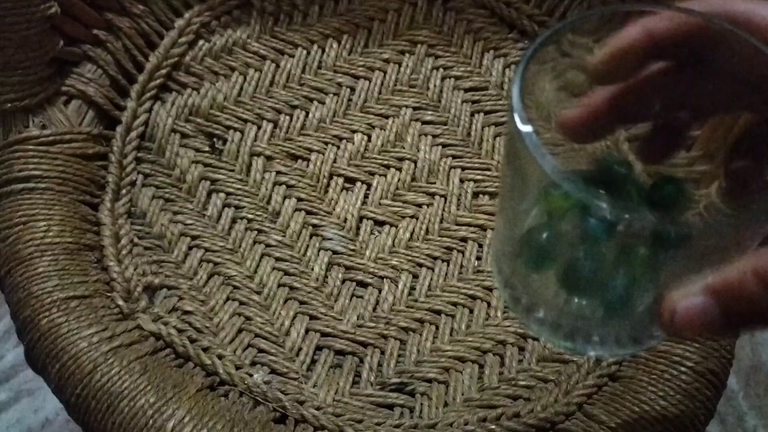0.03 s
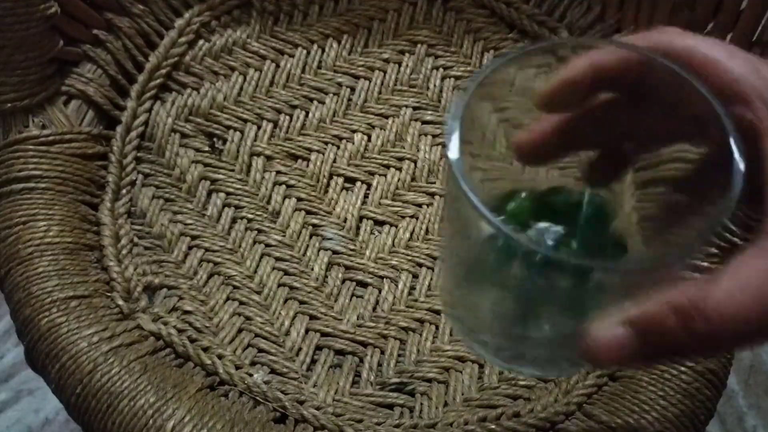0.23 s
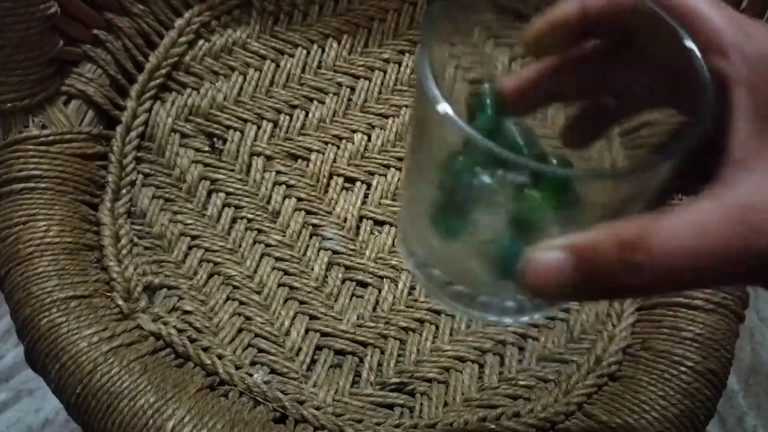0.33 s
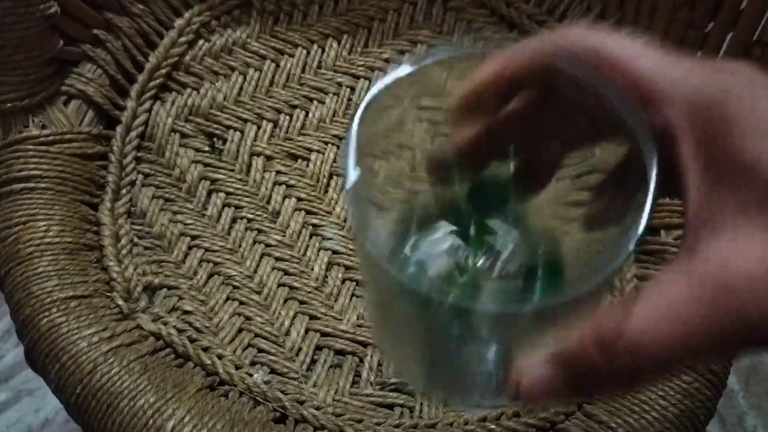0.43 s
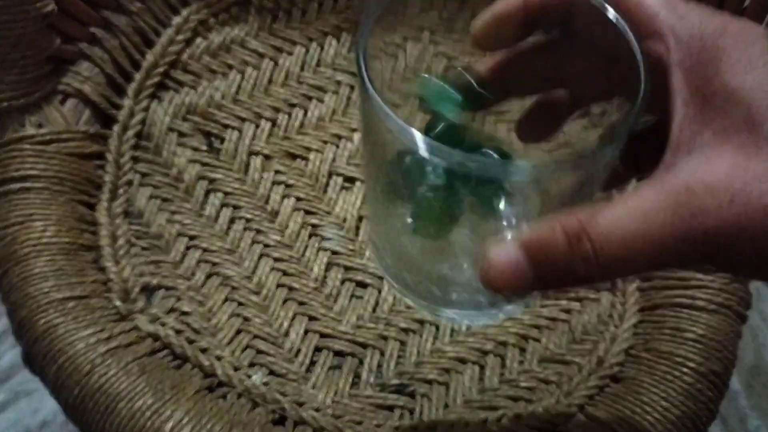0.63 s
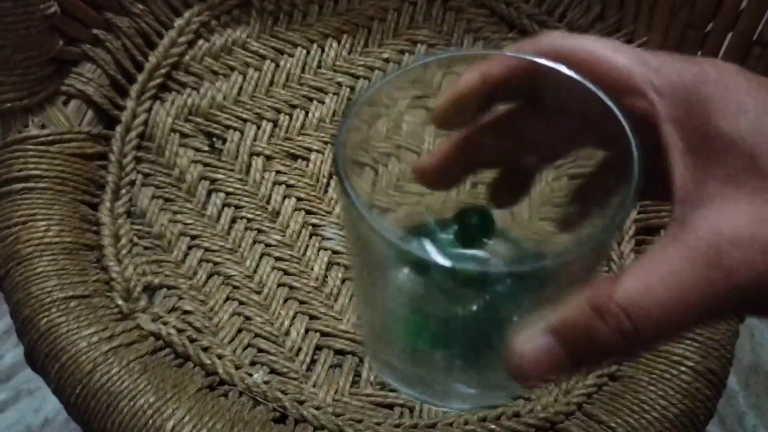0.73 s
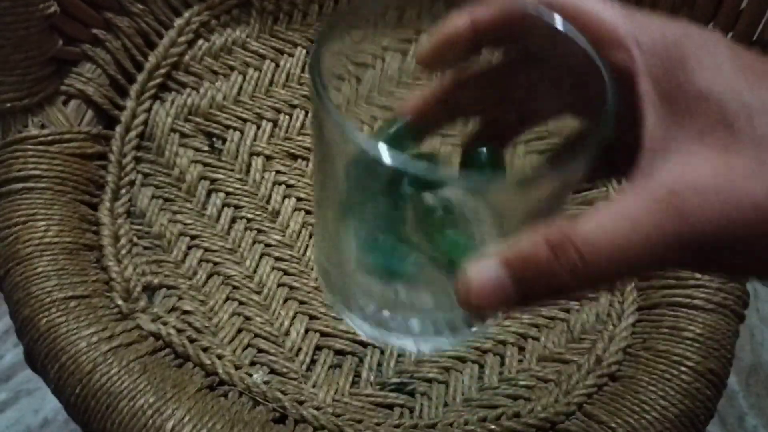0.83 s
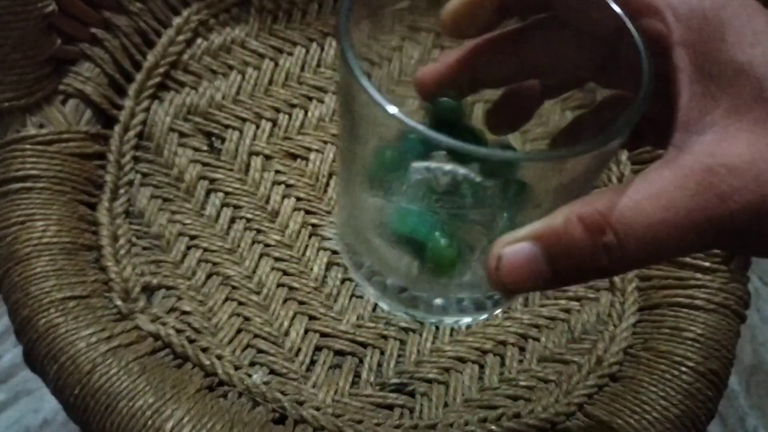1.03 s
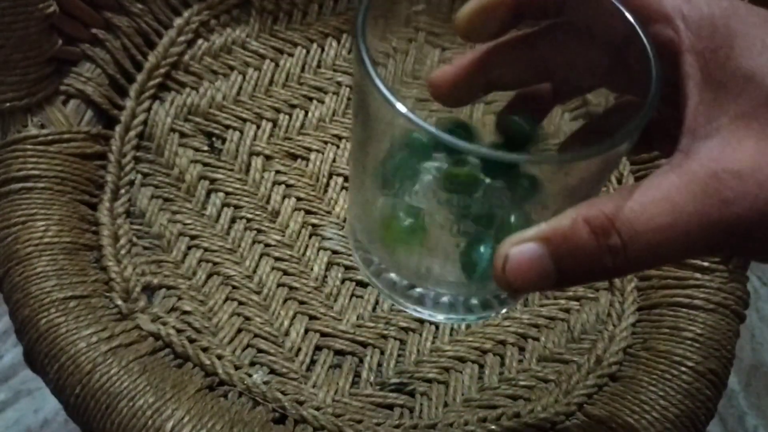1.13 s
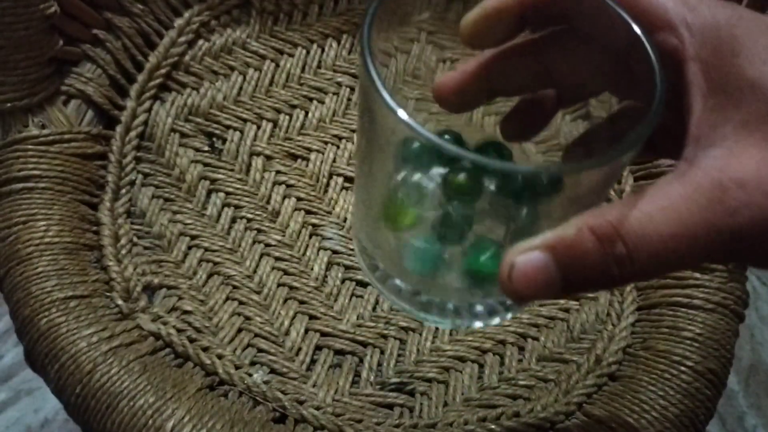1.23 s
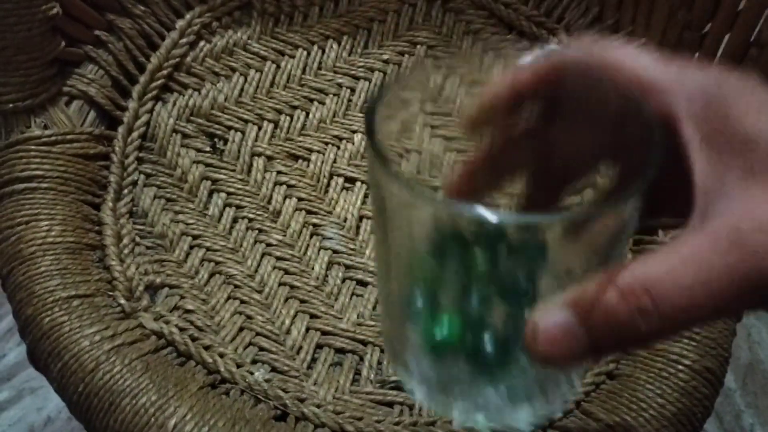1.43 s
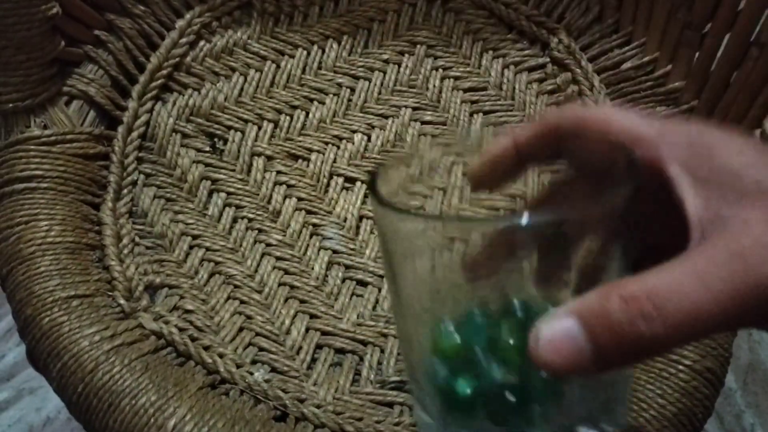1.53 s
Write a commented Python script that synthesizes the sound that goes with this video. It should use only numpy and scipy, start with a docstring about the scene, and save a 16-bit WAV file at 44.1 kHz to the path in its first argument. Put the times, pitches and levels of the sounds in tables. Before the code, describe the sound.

Glass marbles are swirled in a drinking glass close by in a small room. They clack together, rumble over the base and make the glass ring, with a few dull pops, then ease to light ticking over a faint hum.

```python
"""A hand starts to swirl a dozen glass marbles in a drinking glass, close by in a small room.
They clack against each other, rumble over the base and strike the wall, which rings.
Early on, the hardest shakes bring dull pops. After a second the swirl eases to light ticking,
while a low hum like that of a fan, there all along, grows a little and holds steady."""
import sys
import numpy as np
from scipy import signal
from scipy.fft import rfft, irfft
from scipy.io import wavfile
from scipy.ndimage import uniform_filter1d

SR = 44100
rng = np.random.default_rng(int(sys.argv[2]) if len(sys.argv) > 2 else 0)


def store_wav(level_fs):
    """Save 16-bit WAV to argv[1]."""
    pcm = np.round(np.clip(np.atleast_2d(level_fs), -1, 1) * 32767)
    wavfile.write(sys.argv[1], SR, pcm.T.astype(np.int16))


N = 70560
T = np.arange(N) / SR

# Levels in the tables are relative: the settings below turn whole layers up or down.
# how strong the swirl is: (time [s], clatter [dB], ringing wall [dB], rolling [dB])
SWIRL_LEVELS = [(.073, -34.5, -37, -49.5), (.115, -36.5, -47, -35.5), (0.149, -32.5, -26, -37),
                (0.216, -22.5, -56, -30), (0.239, -35, -31, -37), (0.273, -18, -22, -27),
                (0.304, -33.5, -19, -35), (0.357, -25.5, -30.5, -25.5), (0.383, -47.5, -24.5, -46),
                (.44, -33, -37, -41.5), (.495, -35, -29.5, -36), (.545, -30, -35.5, -36),
                (.605, -33.5, -28.5, -39.5), (.692, -34, -35, -41), (.725, -37.5, -29.5, -45),
                (.775, -28, -23.5, -37.5), (.815, -31, -31.5, -36.5), (.905, -28, -25.5, -35),
                (.965, -32.5, -28.5, -34.5), (.997, -23.5, -24, -34.5), (1.042, -30, -25, -37.5),
                (1.069, -38.5, -40, -42), (1.17, -34, -37.5, -40.5), (1.21, -33.5, -32.5, -42.5),
                (1.34, -33.5, -41, -38), (1.39, -38, -41, -40), (1.53, -36, -39.5, -41),
                (1.6, -38.5, -42.5, -38)]
# single hard hits: (time [s], clack [dB], middle ring [dB], low ring [dB], high pings [dB])
HARD_HITS = [(.123, -7.5, -32, -36, -39), (.145, -4, -24, -17.5, -8), (0.149, 1, -24, -13, -17),
             (.177, -7, -9, -9.5, -14), (0.185, -2, -32, -29, -10), (.206, -20, -21, -33, -12),
             (0.215, -11, -16, -11, -14), (0.244, -5, -25, -14, -14), (.251, -4, -30, -25, -13),
             (0.2565, -14, -21, -9, -9), (0.2679, -14, -7, -20, -8), (0.2753, 2, 0, -24, -4),
             (0.2843, -0.5, -3, -5, -12), (0.2902, -3, -10, -8, -4.5), (0.3092, -9, -26, -14.5, -9),
             (0.3159, -5, -11, -8, -25), (.325, -7, -10, -17, -15), (.3305, -1.5, -12, -8, -24),
             (0.346, -1.5, -3, -13.5, -4), (.3535, -11, -23, -7.5, -23), (.3615, -9, -26, -29, -8.5),
             (.393, -12, -10, -29, -25), (.406, -11, -11, -13, -16), (0.453, -10, -23, -14, -22),
             (.470, 0, -11, -10.5, -9), (0.4853, -6, -14, -11, -6), (.5025, -11.5, -18, -23, -17),
             (0.5107, -1, -9.5, -10, -7.5), (0.526, -7, -15, -8.5, -27), (.562, -9, -12.5, -14, -10),
             (.586, -8, -26, -28, -14), (0.605, -17, -11.5, -18, -27), (.6765, -13, -20, -15, -16),
             (0.7005, 0, -7, -23, -14), (.759, -9.5, -9, -21, -28), (0.7709, -18, -26, -7, -12),
             (.788, -3, -7, -10, -10), (.812, -27, -14, -30, -13), (.834, -10, -19, -39, -17),
             (0.853, -28, -19, -16, -11.5), (.880, -7, -22, -36, -11), (0.905, -7, -15, -17, -14),
             (.93, -9, -10.5, -8, -12), (0.988, -5, -19, -16, -28), (0.996, -12, -20, -37, -17),
             (1.021, -10, -8, -11.5, -6.5), (1.034, -17, -11, -36, -27), (1.053, -15, -26, -28, -25),
             (1.080, -22, -21, -12, -16.5), (1.093, -19, -19, -21, -24), (1.1109, -18, -21, -38, -35),
             (1.144, -26, -23, -13, -16), (1.488, -15.5, -34, -34, -34)]
# marbles settling against each other: (time [s], tick [dB], small clink [dB])
SETTLING_TICKS = [(1.1285, -18, -48), (1.178, -22, -46), (1.2, -9, -32), (1.2642, -14, -38),
                  (1.2909, -25, -36), (1.3172, -30, -46), (1.332, -24, -46), (1.4092, -17.5, -54),
                  (1.465, -24, -54)]
# tone colour of a clack: (frequency [Hz], level [dB])
CLACK_COLOUR = [(300, -22.5), (1000, -1.5), (1900, -21), (2500, 0), (3100, 1.5), (3500, -1.5), (4100, 0.5),
                (5300, -0.5), (6000, 2), (6400, 1), (7200, 3), (8300, -9.5), (9000, -17), (9600, -28),
                (11000, -19), (12700, -27), (14300, -9), (15400, -7)]
# tones of the glass, damped by the hand; the lowest come from the air inside:
# (frequency [Hz], level [dB], time to fade by 60 dB [s])
GLASS_TONES = [(952, -14, 0.036), (1031, -18, 0.075), (2303, -9, 0.15), (2333, -11.5, 0.09),
               (3098, -6.5, 0.029), (3998, -8, 0.031), (4810, -7.5, 0.11), (4864, -8.5, 0.088),
               (8183, -1.5, 0.021), (10650, -17, 0.027), (11410, -6, 0.026), (14040, -11.5, 0.023),
               (15000, -20, 0.04), (15200, -11, 0.075)]
# boost or cut of the wall's strongest, singing tones: (time [s], level [dB])
SINGING_LEVEL = [(.1, -3), (.42, -6.5), (.52, 6.5), (.65, 0.5), (1.03, 0.5), (1.15, 1), (1.4, -7.5)]
# treble of the light touches on the wall: (time [s], level [dB])
TOUCH_BRIGHTNESS = [(.1, -1.5), (.3, -4.5), (.55, 1.5), (.72, -4), (.87, -2.5), (1.05, -2.5), (1.5, -4)]
# tone colour of the splash, the short hiss of a blow on the wall: (frequency [Hz], level [dB])
SPLASH_COLOUR = [(1500, -14.5), (3000, -2.5), (5000, -16), (8300, 1), (9400, -22), (10700, 2.5), (11500, 0),
                 (12700, -1), (14300, -7), (15400, 3)]
# dull pops: (time [s], signed peak [gain], upper edge [Hz], lower edge [Hz], crack on top [gain])
DULL_POPS = [(0.2236, 0.5, 1560, 120, 0.035), (0.275, -0.24, 375, 124, 0.14),
             (0.3471, -0.33, 705, 126, 0.11), (.368, -0.5, 1550, 487, 0.71), (.3692, 0.48, 1570, 318, 0.42),
             (0.47, 0.35, 1740, 172, 0.2), (0.5119, 0.42, 2200, 155, 0.16), (0.5243, -0.35, 1370, 200, 1),
             (0.5569, -0.1, 806, 160, .02), (0.5677, -0.72, 1840, 342, 0.53), (0.569, 0.2, 2560, 565, 0.58),
             (0.5705, -0.12, 1720, 201, 0.52), (.572, 0.41, 1350, 145, 0.17),
             (0.5848, 0.29, 1770, 146, 0.068), (0.7008, -0.62, 1070, 557, 0.51),
             (0.7014, 0.12, 780, 114, 0.035)]
# tone colour of rolling; the air in the glass rings near 1 kHz: (frequency [Hz], level [dB])
ROLL_COLOUR = [(40, -25.5), (110, -8), (170, 4.5), (220, 2), (290, 2.5), (400, -2.5), (730, -11), (880, -1),
               (975, 4), (1200, -5), (1700, -13.5), (3000, -33.5)]
# tones of the hum: (frequency [Hz], early level [dB], late level [dB])
HUM_TONES = [(84.9, -50, -38), (170.8, -44, -45.5)]
# tone colour of the room noise: (frequency [Hz], level [dB])
NOISE_COLOUR = [(25, -13), (80, 6), (220, 2), (283, 10.5), (350, -8), (600, -2), (2000, -11.5),
                (15000, -33)]

START_S, HUM_CHANGE_S = 0.07, (0.74, 1.23)
CLACKS_PER_S, TOUCHES_PER_S, BUMPS_PER_S = 1100, 740, 1500
THINNING = 0.36   # gentler swirling gives fewer clacks: dB of rate per dB of level
# a T60 is the time a sound takes to fade by 60 dB
SNAP_T60_S, SCATTER_T60_S, SPLASH_T60_S, ROOM_T60_S = 0.002, 0.024, 0.037, 0.15
TINT_DB, TINT_STEP_HZ = 2.8, 607   # random colour of each clack
LOW_RING_HZ, TREBLE_HZ = 3500, 7500   # low ring below the first, high pings above the second
SINGING_HZ, CUTOFF_HZ = (4600, 5000), 15560
CLACK_DB, CLATTER_DB, ROLL_DB, ROOM_DB, NOISE_DB = 5.5, -1.5, -2, -13.5, -49
HARD_RING_DB, LIGHT_RING_DB, HARD_SPLASH_DB, LIGHT_SPLASH_DB = -11, 8, 6.5, -10


def marbles(level_db, kinds=16):
    """Marbles knock together: many small clacks under the hard ones, thinning out to single ticks."""
    per_s = CLACKS_PER_S * from_db(THINNING * (level_db - level_db.mean()))
    clatter = np.zeros(N)
    for _ in range(kinds):
        clicks = contacts(per_s / kinds, spread_db=4.5)
        clatter += signal.fftconvolve(clicks, clack(scatter_share=0.64))[:N]
    out = steady(clatter, size=1800) * from_db(level_db + CLATTER_DB) * (T > START_S)
    for when, db, *_ in HARD_HITS:   # a hard hit sets more marbles chattering
        add(out, when, from_db(db + CLACK_DB) * clack(scatter_share=0.82))
    clink = ring(signal.unit_impulse(N), hz=6050, t60=0.049)
    for when, db, clink_db in SETTLING_TICKS:   # a tick barely disturbs the others
        add(out, when, from_db(clink_db) * clink)
        add(out, when, from_db(db + CLACK_DB) * clack(scatter_share=0.33))
    return colour(out, CLACK_COLOUR)


def clack(scatter_share, size=4096):
    """Marble on marble: a snap, then its scatter among the others, in a colour of its own."""
    sound = burst(SNAP_T60_S) + scatter_share * scatter(SCATTER_T60_S)
    steps = np.fft.rfftfreq(size, 1 / SR) / TINT_STEP_HZ
    tint_db = TINT_DB * np.interp(steps, np.arange(size), rng.standard_normal(size))
    return unit_energy(irfft(rfft(sound, size) * causal(from_db(tint_db))))


def wall(level_db):
    """Light touches and hard hits ring each tone of the glass and give a bright splash."""
    touches = contacts(TOUCHES_PER_S, spread_db=2) * (T > START_S)
    times, _, middle_db, low_db, ping_db = np.transpose(HARD_HITS)
    sing_db = np.interp(T, *np.transpose(SINGING_LEVEL))
    bright_db = np.interp(T, *np.transpose(TOUCH_BRIGHTNESS))
    # a blow pushes all tones the same way, so close pairs start together and then waver
    push = rng.choice([-1, 1], N)
    rings = np.zeros(N)
    for hz, db, t60 in GLASS_TONES:
        high, sings = hz > TREBLE_HZ, SINGING_HZ[0] < hz < SINGING_HZ[1]
        light = steady(ring(touches * rng.standard_normal(N), hz, t60), size=2000)
        light *= np.sqrt(t60) * from_db(level_db + LIGHT_RING_DB + bright_db * high)
        hit_db = ping_db if high else low_db if hz < LOW_RING_HZ else middle_db
        blows = np.zeros(N)
        blows[(times * SR).astype(int)] = from_db(HARD_RING_DB + hit_db)
        hard = ring(blows * push * from_db(rng.standard_normal(N)), hz, t60)
        rings += from_db(db + sing_db * sings) * (light + hard)
    splash = steady(signal.fftconvolve(touches, scatter(SPLASH_T60_S))[:N])
    splash *= from_db(level_db + LIGHT_SPLASH_DB + bright_db)
    for when, db in zip(times, ping_db):
        add(splash, when, from_db(db + HARD_SPLASH_DB) * scatter(SPLASH_T60_S))
    return rings + colour(splash, SPLASH_COLOUR)


def pops(size=1500):
    """Hard shakes bring dull pops: each is one quick pulse with a short crack and a slower swing back."""
    out, click = np.zeros(N), signal.unit_impulse(size)
    crack = ring(click, hz=3490, t60=0.0021)
    for when, peak, upper_hz, lower_hz, crack_gain in DULL_POPS:
        pulse = signal.lfilter(*signal.butter(4, upper_hz, fs=SR), click)
        pulse = signal.lfilter(*signal.butter(1, [lower_hz * 0.86, lower_hz * 2.77], "band", fs=SR), pulse)
        pulse = signal.lfilter(*signal.butter(1, lower_hz, "high", fs=SR), pulse)
        pulse /= np.abs(pulse).max()
        add(out, when, peak * pulse - np.sign(peak) * crack_gain * crack)
    return out


def rolling(level_db):
    """Marbles roll over the base, and their small bumps blur into a rumble."""
    rumble = colour(contacts(BUMPS_PER_S, spread_db=4.3), ROLL_COLOUR)
    return steady(rumble) * from_db(level_db + ROLL_DB) * (T > START_S)


def background():
    """Faint room noise and a fan-like hum whose lower tone swells late."""
    hum = np.zeros(N)
    for hz, early_db, late_db in HUM_TONES:
        height = np.sqrt(2) * from_db(np.interp(T, HUM_CHANGE_S, [early_db, late_db]))
        hum += height * np.sin(2 * np.pi * (hz * T + rng.random()))
    noise = from_db(NOISE_DB) * colour(rng.standard_normal(N), NOISE_COLOUR)
    fade_in = np.clip((T - START_S) / 0.019, 0, 1)
    return (hum + noise) * fade_in


def contacts(per_s, spread_db):
    """Random clicks, mostly small with a few large ones."""
    sizes = from_db(spread_db * np.minimum(rng.exponential(1, N), 4)) * rng.choice([-1, 1], N)
    return sizes * (rng.random(N) < per_s / SR)


def ring(x, hz, t60):
    """Each click in x starts a fading tone as tall as the click."""
    decay, angle = from_db(-60 / (t60 * SR)), 2 * np.pi * hz / SR
    return signal.lfilter([0, np.sin(angle)], [1, -2 * decay * np.cos(angle), decay * decay], x + 1e-18)


def burst(t60, size=3000):
    """Noise that starts at once and dies away."""
    return unit_energy(rng.standard_normal(size) * from_db(-60 * T[:size] / t60))


def scatter(t60, size=3000, build_s=0.00026):
    """Dying noise that takes a moment to build up."""
    return unit_energy(burst(t60, size) * (1 - np.exp(-T[:size] / build_s)))


def colour(x, points):
    """Give a sound the tone colour in a table, with an average power gain of one."""
    hz, db = np.transpose(points)
    log_hz = np.log(np.fft.rfftfreq(2 * N, 1 / SR) + 1)
    gain = from_db(np.interp(log_hz, np.log(hz), db))
    gain /= np.sqrt(np.mean(gain ** 2))
    return irfft(rfft(x, 2 * N) * causal(gain))[:N]


def causal(gain):
    """Turn a gain curve into a filter that never sounds early."""
    cepstrum = irfft(np.log(gain))
    one_sided = np.r_[cepstrum[0], 2 * cepstrum[1:len(gain) - 1]]
    return np.exp(rfft(one_sided, len(cepstrum)))


def steady(x, size=1300):
    """Hold the level near one, averaged over `size` samples."""
    power = np.maximum(uniform_filter1d(x ** 2, size), 0)
    return x / np.sqrt(power + 1e-3 * np.mean(x ** 2))


def unit_energy(x):
    """Scale a sound to an energy of one."""
    return x / np.sqrt(np.sum(x ** 2) + 1e-20)


def from_db(db):
    """Turn decibels into a gain to multiply by."""
    return 10 ** (np.asarray(db) / 20)


def add(out, when, sound):
    """Mix a sound in at a time in seconds."""
    start = int(when * SR)
    out[start:start + len(sound)] += sound[:N - start]


def scene():
    """The glass of marbles and its short room echo, plus the pops and the background."""
    times, *levels = np.transpose(SWIRL_LEVELS)
    clatter_db, wall_db, roll_db = [np.interp(T, times, level) for level in levels]
    glass = marbles(clatter_db) + wall(wall_db) + rolling(roll_db)
    echo = signal.fftconvolve(glass, burst(ROOM_T60_S, size=16000))[:N]
    return (glass + from_db(ROOM_DB) * echo + pops() + background())[None]


def record(dry):
    """Round off the tallest peaks and cut the highest treble."""
    rounded = 1.401 * np.tanh(dry / 1.622)
    return signal.sosfilt(signal.ellip(10, .3, 80, CUTOFF_HZ, fs=SR, output="sos"), rounded)


dry = scene()
out = record(dry)
store_wav(out)
```